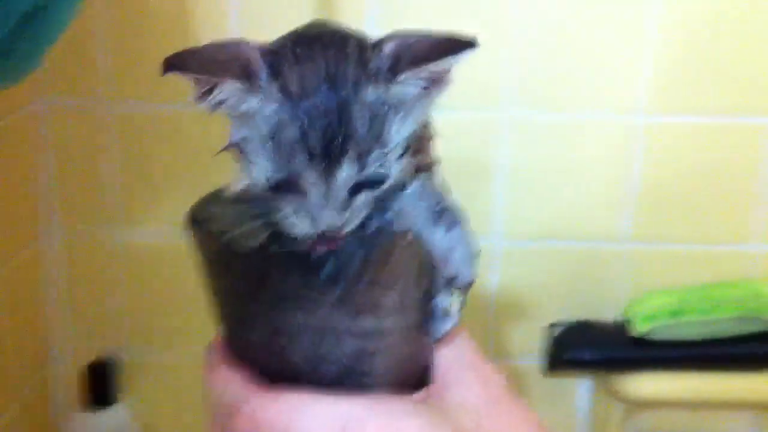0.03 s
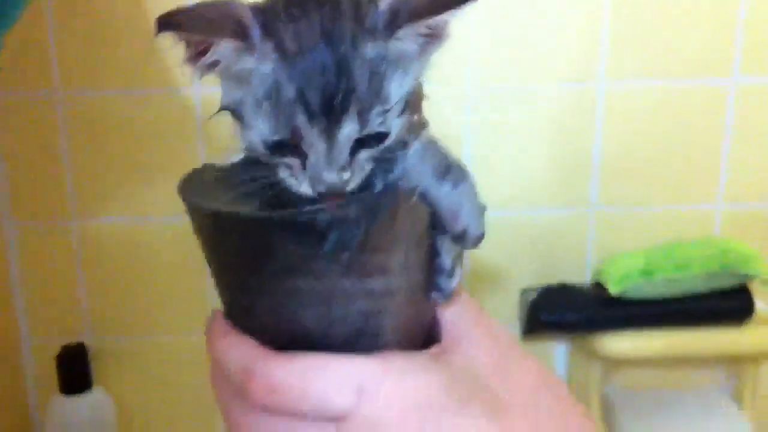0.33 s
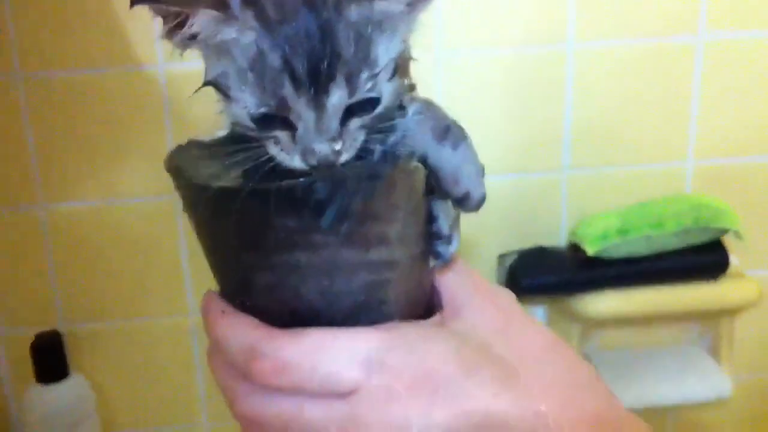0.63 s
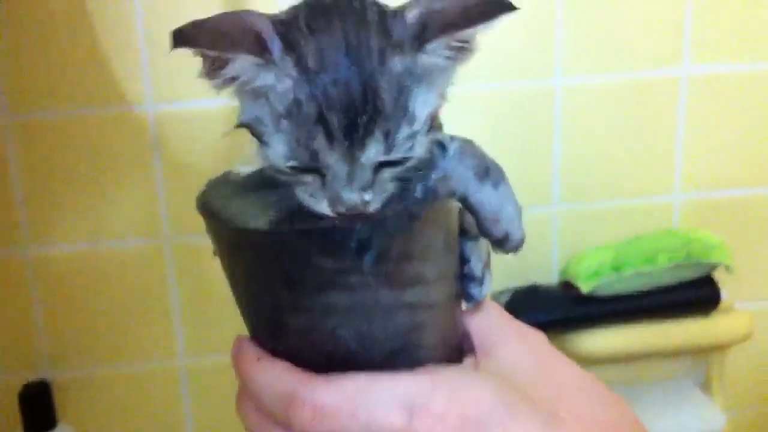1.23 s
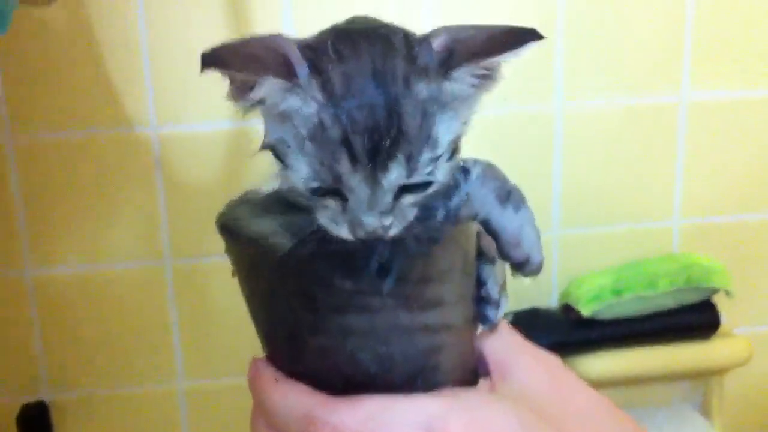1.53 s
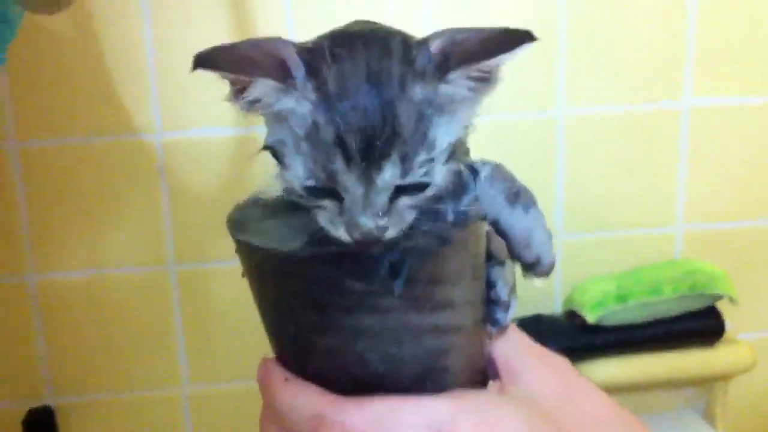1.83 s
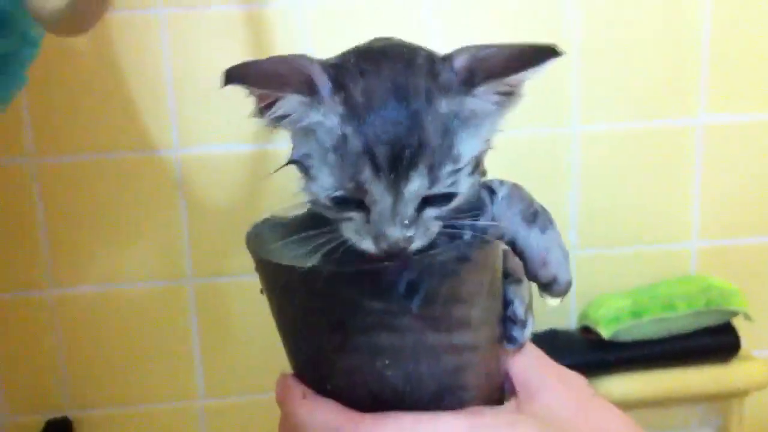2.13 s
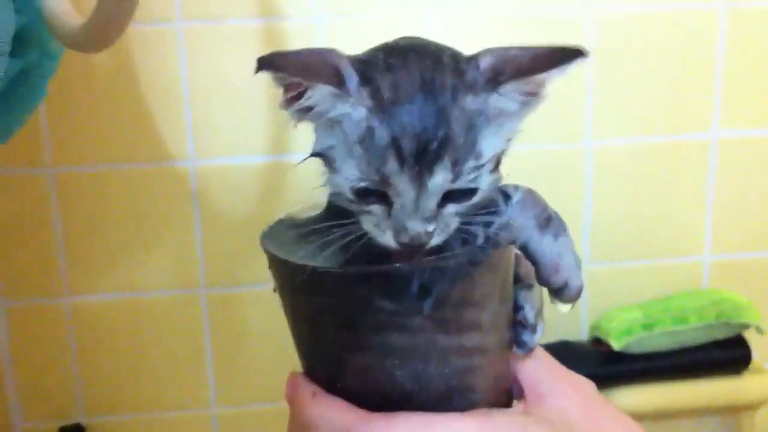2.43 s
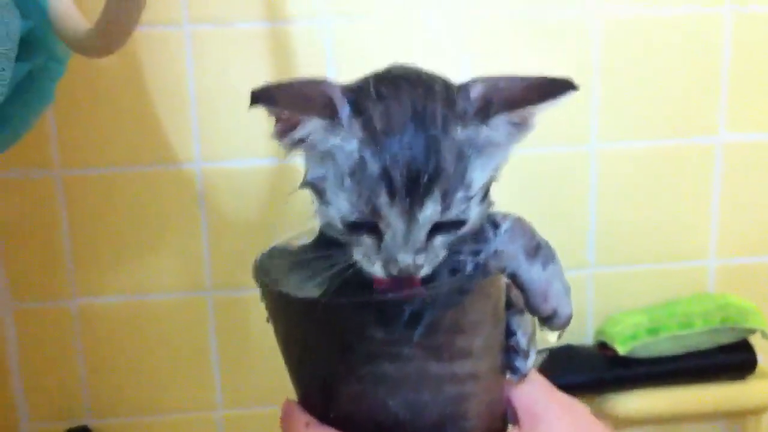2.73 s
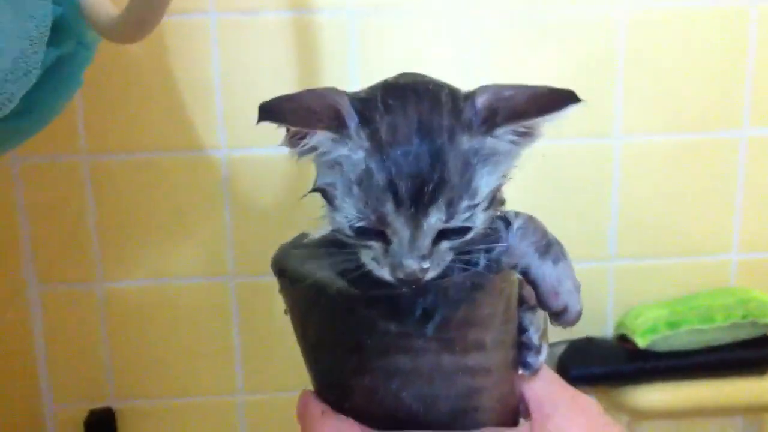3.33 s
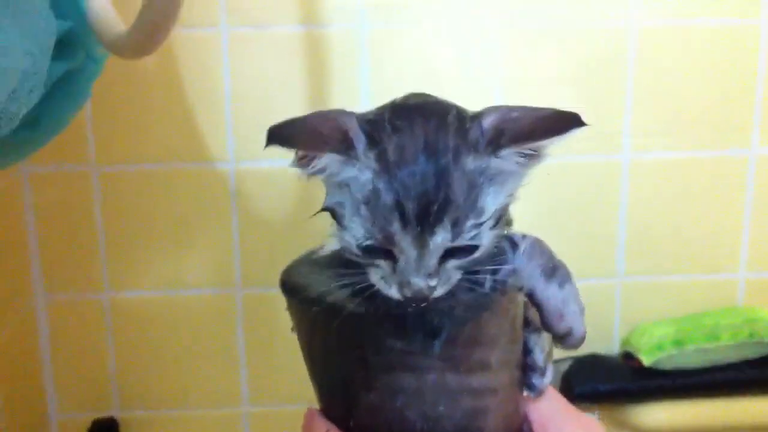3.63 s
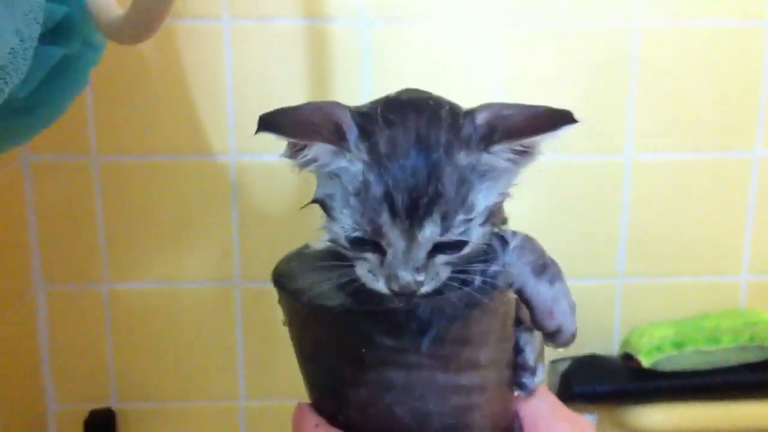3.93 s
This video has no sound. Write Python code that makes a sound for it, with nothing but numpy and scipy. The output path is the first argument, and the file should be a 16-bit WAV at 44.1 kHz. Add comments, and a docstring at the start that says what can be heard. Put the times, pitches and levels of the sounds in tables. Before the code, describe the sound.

A tap runs steadily into a tub in a small tiled bathroom, a bright hiss with spatter, bubbles and little splashes. Something bumps softly in the tub, then more faintly at the end. The microphone is close by.

```python
"""Small tiled bathroom, one small microphone near the tub, mono. A tap is already running:
the jet hisses, droplets spatter, and the stream drums on the tub and beats small bubbles into the water.
From the start larger bubbles plop and single drops tick; from 0.8 s small splashes join them.
At 1.6 s something bumps softly in the tub and the water sloshes. A fainter bump comes
just before the end at 4 s, with the tap still running."""
import sys
import numpy as np
from scipy import signal
from scipy.fft import rfft, irfft
from scipy.io import wavfile

SR = 44100
rng = np.random.default_rng(int(sys.argv[2]) if len(sys.argv) > 2 else 0)


def unload_wav(signal):
    """Save mono or channel-first audio to the path in sys.argv[1] as 16-bit WAV at rate SR, clipped to [-1, 1]."""
    wavfile.write(
        sys.argv[1],
        SR,
        np.round(np.clip(np.atleast_2d(signal).T, -1, 1) * 32767).astype(np.int16),
    )


N = 4 * SR
T = np.arange(N) / SR


def from_db(db):
    """Decibels to gain."""
    return 10 ** (np.asarray(db) / 20)


def rms_one(x):
    """Scale to unit power."""
    return x / np.sqrt(np.mean(x ** 2) + 1e-20)


def since(s):
    """Seconds since a moment, zero before it."""
    return np.maximum(T - s, 0)


def drift(rate_hz):
    """Slow random wander with a spread of 1."""
    hop, settle = 40, 2000
    r = np.exp(-2 * np.pi * hop * rate_hz / SR)
    slow = signal.lfilter([1], [1, -2 * r, r * r], rng.standard_normal(N // hop + settle + 2))[settle:]
    return np.interp(np.arange(N) / hop, np.arange(len(slow)), rms_one(slow))


def colour(x, spectrum):
    """Give a sound a spectrum; unit power."""
    hz, db = np.transpose(spectrum)
    bins = np.maximum(np.fft.rfftfreq(N, 1 / SR), 1)
    gain = from_db(np.interp(np.log(bins), np.log(hz), db))
    return rms_one(irfft(rfft(x) * gain, N))


def resonate(x, hz, width_hz):
    """One resonance with a gain of 1 at its peak."""
    r = np.exp(-np.pi * width_hz / SR)
    feedforward = np.array([1, 0, -1]) * (1 - r * r) / 2
    feedback = [1, -2 * r * np.cos(2 * np.pi * hz / SR), r * r]
    return signal.lfilter(feedforward, feedback, x + 1e-18 * rng.standard_normal(len(x)))


def band(x, hz, width_hz, skirt=2):
    """A resonance, its sides steepened by a second one `skirt` times as wide."""
    return resonate(resonate(x, hz, width_hz), hz, skirt * width_hz)


def impacts(per_s, spread_db):
    """Random clicks of either sign and uneven size."""
    sizes = from_db(spread_db * np.minimum(rng.exponential(1, N), 3.8)) * rng.choice([-1, 1], N)
    return sizes * (rng.random(N) < per_s / SR)


def fade_power(power, fade_s):
    """Spread each burst of power over a dying tail."""
    r = np.exp(-2 / (fade_s * SR))
    return signal.lfilter([1 - r], [1, -r], power + 1e-12)


def bathroom(x, wet_db, t60_s=0.21, treble_t60_s=0.072, split_hz=4000, delay_s=0.0031):
    """The direct sound reaches the microphone first, then the tail off the tiles; treble dies sooner."""
    t, white = T[:SR], rng.standard_normal(SR)
    low = signal.sosfilt(signal.butter(1, split_hz, fs=SR, output="sos"), white)
    tail = low * from_db(-60 * t / t60_s) + (white - low) * from_db(-60 * t / treble_t60_s)
    tail *= t > delay_s
    return x + from_db(wet_db) * signal.fftconvolve(x, tail / np.linalg.norm(tail))[:N]


# soft knocks in the tub: t/s, level/dB
BUMPS = [(1.608, -25), (3.96, -34.5)]
# modes of the knocked tub: f/Hz, relative level/dB, t60/s
BUMP_MODES = [(158, -15.5, 0.28), (219, -11, 0.39), (274.4, -2.5, 0.24), (490, -25.5, 0.22)]
# spectrum of the sloshing water: f/Hz, relative level/dB
SLOSH_SPECTRUM = [(30, -17), (90, -8), (160, 3), (300, -2), (420, -2.5), (700, -2.5), (1200, -11),
                  (3000, -48)]

def bumps(rise_s=0.0073, slosh_db=-19.5, slosh_peak_s=0.043):
    """A soft knock sets the low modes of the tub ringing, and the water sloshes after it."""
    out, slosh = np.zeros(N), colour(rng.standard_normal(N), SLOSH_SPECTRUM)
    for s, db in BUMPS:
        t = since(s)
        ring = sum(from_db(mode_db - 60 * t / t60) * np.sin(2 * np.pi * hz * t)
                   for hz, mode_db, t60 in BUMP_MODES)
        attack = 1 - np.exp(-(t / rise_s) ** 2)
        swell = t / slosh_peak_s * np.exp(1 - t / slosh_peak_s)
        out += from_db(db) * (ring * attack + from_db(slosh_db) * swell * slosh)
    return out


# small splashes in the tub: t/s, level/dB, centre f/Hz, fade/s
SPLASHES = [(0.829, -34, 2700, 0.0062), (1.017, -37.5, 2520, 0.0079), (1.659, -43, 1950, 0.065),
            (1.663, -34, 6900, 0.034), (2.143, -42, 4150, 0.037), (2.296, -36, 9400, 0.013),
            (2.775, -45.5, 2880, 0.026), (3.122, -42, 3940, 0.032), (3.484, -34, 4200, 0.0041),
            (3.617, -45.5, 5700, 0.046)]

def splashes(rise_s=0.001):
    """A splash is a quick, fading shower of droplets."""
    out = np.zeros(N)
    for s, db, hz, fade_s in SPLASHES:
        t = since(s)
        shower = band(impacts(per_s=11000, spread_db=-3.0), hz, width_hz=0.76 * hz)
        out += from_db(db) * rms_one(shower) * (1 - np.exp(-t / rise_s)) * np.exp(-t / fade_s)
    return out


# single drops: t/s, peak level/dB, centre f/Hz
DROPS = [(0.0708, -26.5, 6460), (0.125, -28, 6960), (0.278, -29, 9500), (0.347, -31, 5500),
         (.3735, -30, 6940), (.532, -29, 9600), (0.641, -27, 6600), (0.855, -29, 5200), (.9203, -27, 7100),
         (1.0045, -29, 7840), (1.299, -28, 7800), (1.391, -25.5, 7500), (1.8985, -20, 7700),
         (1.9855, -28, 8000), (2.1615, -27, 8400), (2.364, -30, 4400), (2.4427, -24.5, 9800),
         (2.508, -23.5, 7800), (3.484, -27, 9000), (3.611, -25, 10200), (3.68, -26, 8400),
         (3.793, -25, 7800)]

def drops(fade_s=0.0009):
    """A drop slaps a hard surface: a millisecond of bright crack."""
    out, t = np.zeros(N + SR), T[:SR // 50]
    for s, db, hz in DROPS:
        burst = rng.standard_normal(len(t)) * np.exp(-t / fade_s)
        crack = band(burst, hz, width_hz=0.4 * hz)
        out[int(s * SR):][:len(t)] += from_db(db) * crack / np.abs(crack).max()
    return out[:N]


# large bubbles: t/s, level/dB, f/Hz, length/s
PLOPS = [(0.0374, -29, 1300, 0.0072), (0.072, -29.5, 3470, 0.0018), (.0855, -28.5, 1265, 0.0071),
         (0.133, -38.5, 935, 0.0097), (0.457, -40.5, 880, 0.01), (0.568, -39, 1270, 0.0058),
         (0.8014, -35, 1310, 0.0079), (0.827, -32.5, 2190, 0.0054), (.829, -38.5, 3480, .006),
         (0.8465, -31, 1060, 0.0022), (1.06, -28, 1190, 0.0026), (1.71, -33.5, 1610, 0.0021),
         (1.817, -46, 1190, 0.028), (1.994, -47.5, 918, 0.018), (2.338, -36, 910, 0.0028),
         (2.393, -41.5, 1725, 0.012), (2.514, -39.5, 988, 0.011), (2.569, -36.5, 1040, 0.0025),
         (2.707, -29.5, 1200, 0.0022), (2.75, -36.5, 1410, 0.0082), (2.805, -42.5, 817, 0.0072),
         (2.892, -41.5, 933, 0.0084), (3.292, -44, 1370, 0.0086), (3.383, -39, 1633, 0.0088),
         (3.449, -38, 970, 0.013), (3.566, -38.5, 1320, 0.0058), (3.653, -35, 816, 0.0072),
         (3.707, -38.5, 2420, 0.0034), (3.78, -43.5, 1450, 0.0088), (3.828, -44.5, 1004, 0.0087),
         (3.952, -34.5, 609, 0.015), (3.963, -41.5, 963, 0.024)]

def plops(rise_s=0.00025, glide_per_s=6.6, slap_db=-11, slap_fade_s=0.008):
    """Water slaps shut over a large bubble, which rings, rises a little in pitch and stops as it bursts."""
    out, t = np.zeros(N + SR), T[:SR // 8]
    attack = 1 - np.exp(-t / rise_s)
    for s, db, hz, length in PLOPS:
        phase = 2 * np.pi * hz * t * (1 + glide_per_s * (t - length) / 2)
        ring = np.exp(-(t / length) ** 3) * np.sin(phase)
        noise = rms_one(band(rng.standard_normal(len(t)), hz, width_hz=0.4 * hz))
        slap = from_db(slap_db) * noise * np.exp(-t / slap_fade_s)
        out[int(s * SR):][:len(t)] += from_db(db) * attack * (ring + slap)
    return out[:N]


def bubbles(per_s, low_hz, high_hz, spread_db=2.0, cycles_per_decay=14, glide_per_decay=0.0502):
    """A swarm of small bubbles, each ringing down while its pitch rises; unit power."""
    out = np.zeros(N + SR)
    born, draws = rng.random(N) < per_s / SR, rng.random((N, 2))
    for i in np.flatnonzero(born):
        pitch_draw, size_draw = draws[i]
        hz = low_hz * (high_hz / low_hz) ** pitch_draw
        size = from_db(spread_db * min(-np.log(1 - size_draw), 3.5))
        age = np.arange(0, 5, hz / (cycles_per_decay * SR))  # in decay times
        phase = 2 * np.pi * cycles_per_decay * age * (1 + glide_per_decay * age / 2)
        out[i:i + len(age)] += size * np.exp(-age) * np.sin(phase)
    return rms_one(out[:N])


# how hard the water churns: t/s, relative level/dB
CHURN = [(0, -9), (.5, 1.5), (1.0, -3), (1.45, 0.5), (2.1, 1), (2.5, 2.5), (3.05, -2), (3.37, -0.5),
         (4.0, 0)]

def churn(flow, level_db=-55.5):
    """The stream beats small bubbles into the water; their burble swells and sinks."""
    swell_db = np.interp(T, *np.transpose(CHURN))
    return from_db(level_db + swell_db) * bubbles(per_s=105 * flow, low_hz=1234, high_hz=2078)


# resonances of the tub under the stream: f/Hz, width/Hz, rms level/dB
TUB_RESONANCES = [(163.1, 8.2, -65), (218, 32, -63), (270.9, 4.5, -67), (509.5, 52, -66.5), (763, 26, -69),
                  (960, 24.6, -59), (1543, 29, -63), (1771, 45, -60.5), (2031, 17.3, -60)]

def tub(flow):
    """The stream drums on the tub and keeps its resonances ringing."""
    drumming = rng.standard_normal(N) * np.sqrt(flow)
    return sum(from_db(db) * rms_one(band(drumming, hz, width, skirt=4))
               for hz, width, db in TUB_RESONANCES)


# spectrum of the landing droplets: f/Hz, relative level/dB
SPATTER_SPECTRUM = [(300, 10), (1500, -23), (3000, -10.5), (4500, -2.5), (6200, -3.5), (8000, 2.5),
                    (11000, 3.5), (16000, -6)]

def spatter(flow, level_db=-47, wash_db=-8, patchy_db=4.5):
    """Droplets land as millisecond bursts, each with its own colour and a faint wash off the tiles."""
    bursts = fade_power(impacts(per_s=420 * flow, spread_db=2.5) ** 2, fade_s=0.002)
    wash = from_db(wash_db) ** 2 * fade_power(bursts, fade_s=0.025)
    spray = np.zeros(N)
    for hz in np.geomspace(2000, 14000, num=11):
        noise = resonate(rng.standard_normal(N), hz, width_hz=0.22 * hz) / np.sqrt(hz)
        spray += noise * from_db(patchy_db * drift(rate_hz=80))
    return from_db(level_db) * colour(spray * np.sqrt(bursts + wash), SPATTER_SPECTRUM)


# spectrum of the jet from the tap: f/Hz, relative level/dB
JET_SPECTRUM = [(30, 8), (80, -14), (135, 0), (400, -17), (800, -4.5), (1700, -2.5), (2100, -3),
                (2700, -13), (3800, -6), (4300, 3.5), (4900, -2), (6300, -5.5), (7500, 0), (10500, -1.5),
                (13000, 3), (13350, 7), (13700, 3.5), (14700, 8), (15500, 3.5)]

def jet(level_db=-39, fall_db_per_s=0.37, waver_db=1.02):
    """Bright, smooth hiss of the running tap, heard direct; it wavers and sinks a little."""
    gain = from_db(level_db - fall_db_per_s * (T - T.mean()) + waver_db * drift(rate_hz=20))
    return gain * colour(rng.standard_normal(N), JET_SPECTRUM)


def scene(surge_db=2.5, fizz_db=-58.5):
    """At the tub, one surging flow drives spatter, bubbles and drumming; both channels are alike."""
    flow = from_db(surge_db * drift(rate_hz=14))
    burble = churn(flow)
    fizz = from_db(fizz_db) * bubbles(per_s=130 * flow, low_hz=2262, high_hz=5340)
    mono = jet() + tub(flow) + spatter(flow) + bumps()
    mono += bathroom(burble + plops(), wet_db=-4.5)
    mono += bathroom(fizz + drops() + splashes(), wet_db=-4)
    return np.stack([mono, mono])


def record(dry, low_cut_hz=182, high_cut_hz=15800):
    """The small microphone thins the bass; the top is cut steeply."""
    thin = signal.sosfilt(signal.butter(2, low_cut_hz, "high", fs=SR, output="sos"), dry)
    high_cut = signal.firwin(601, high_cut_hz, fs=SR, window=("kaiser", 8))
    return signal.fftconvolve(thin, high_cut[None], mode="same", axes=1)


dry = scene()
out = record(dry)
unload_wav(out)
```